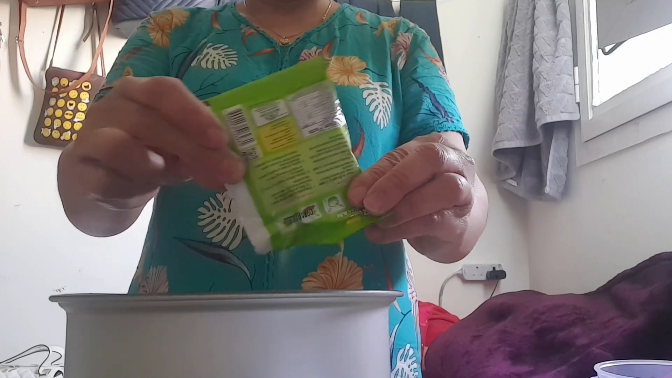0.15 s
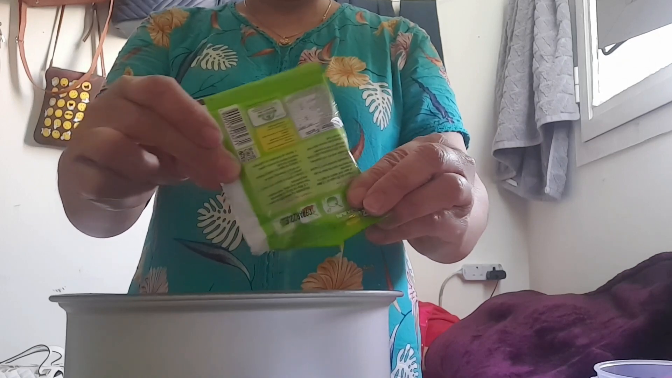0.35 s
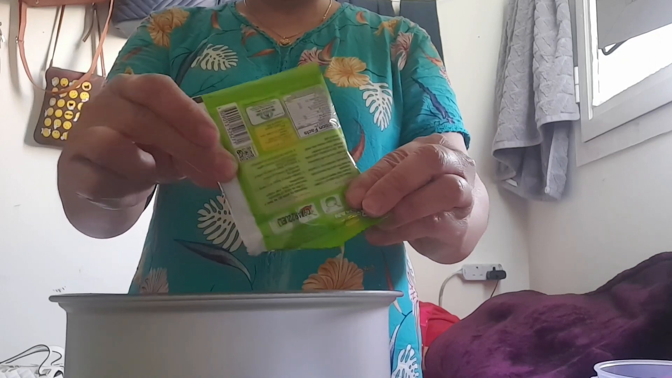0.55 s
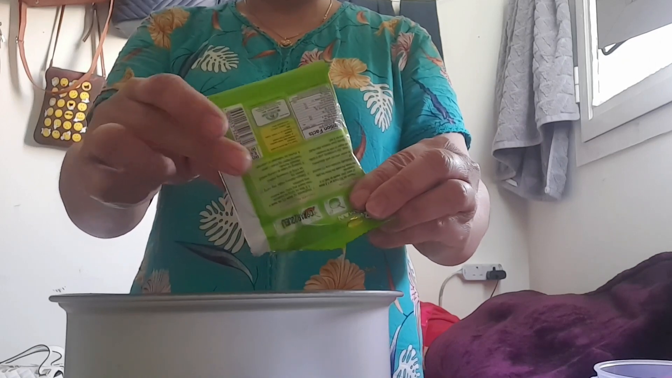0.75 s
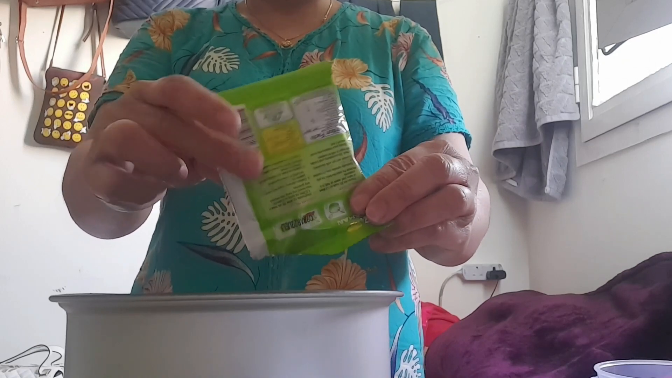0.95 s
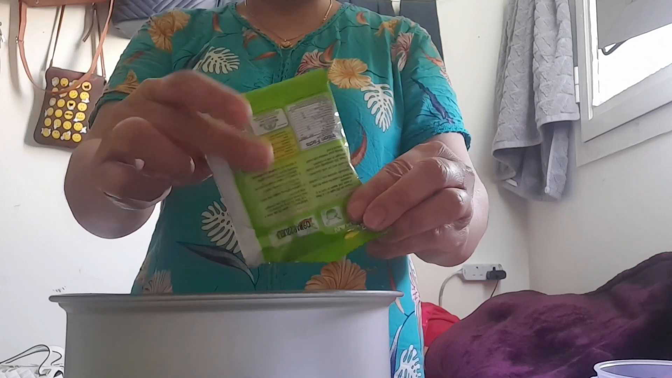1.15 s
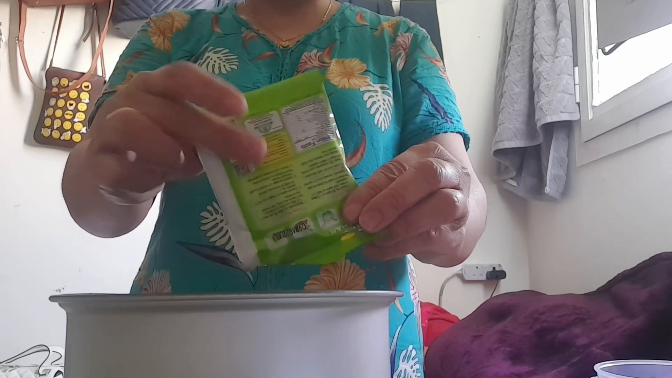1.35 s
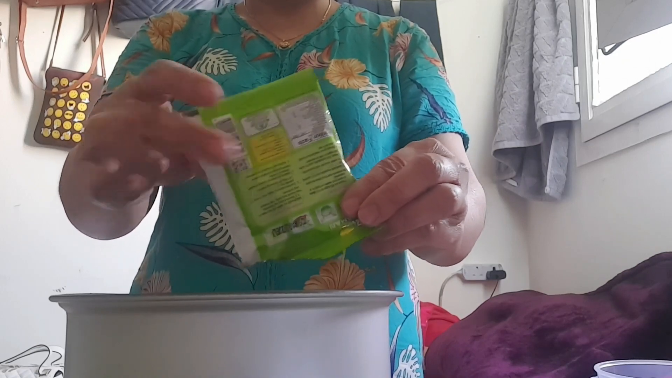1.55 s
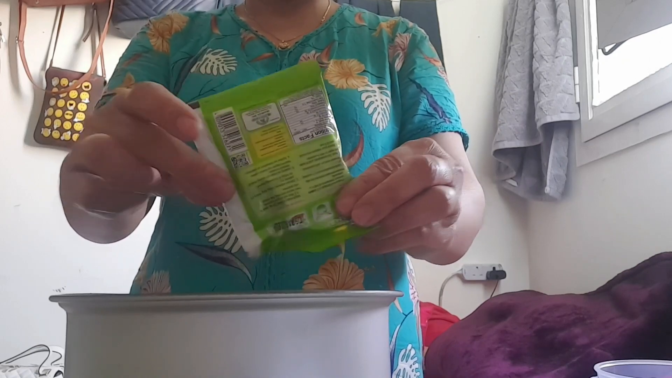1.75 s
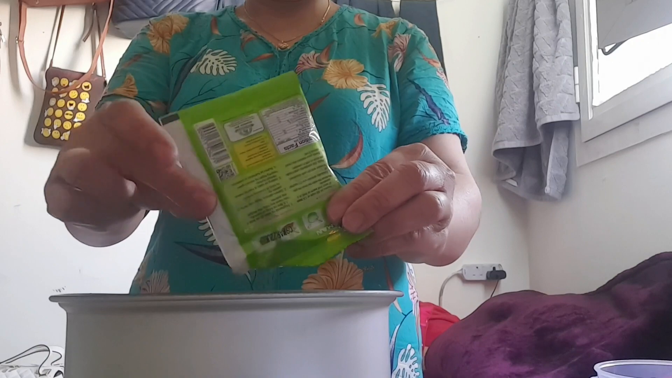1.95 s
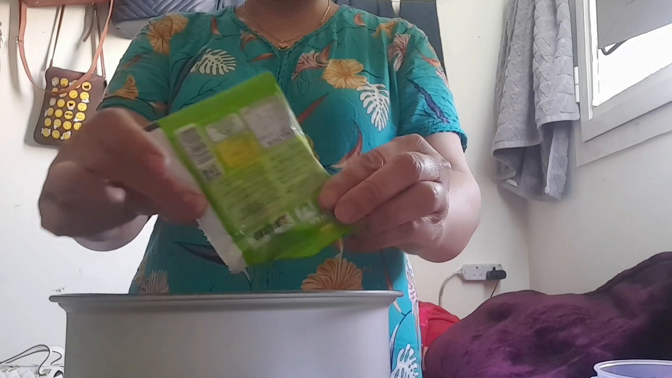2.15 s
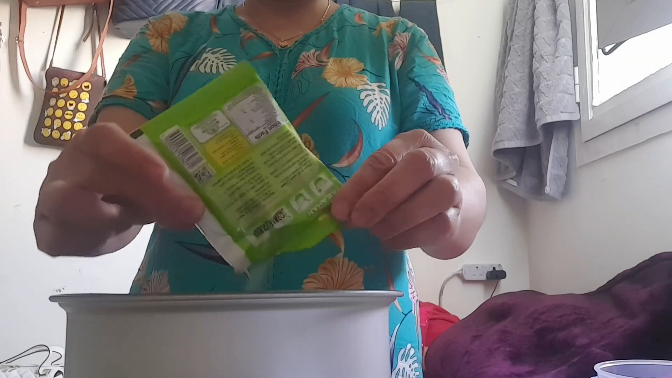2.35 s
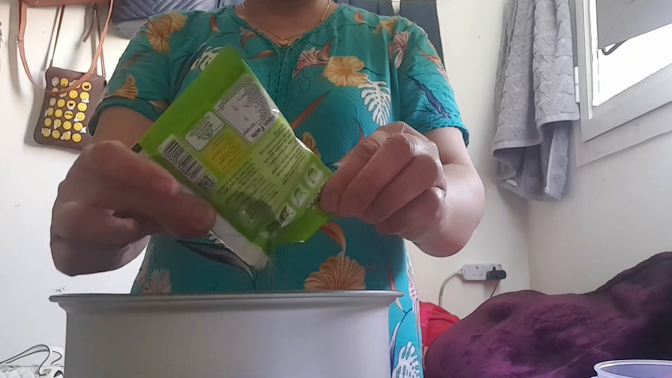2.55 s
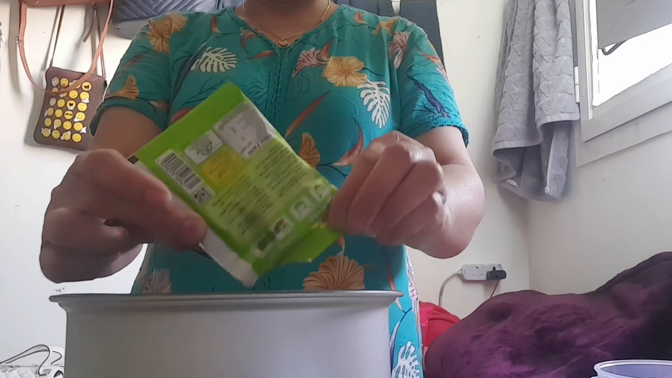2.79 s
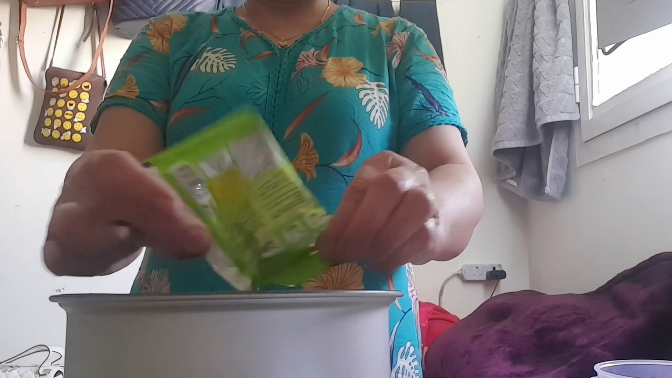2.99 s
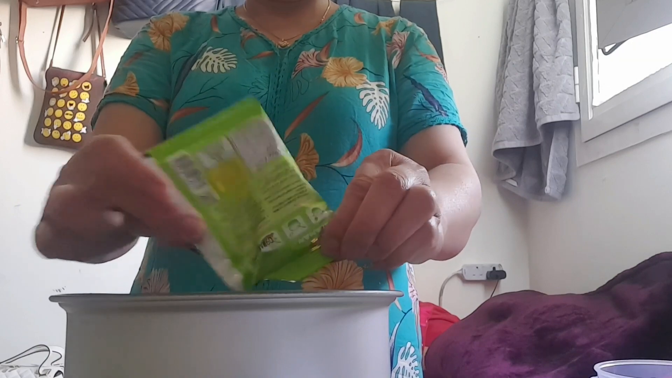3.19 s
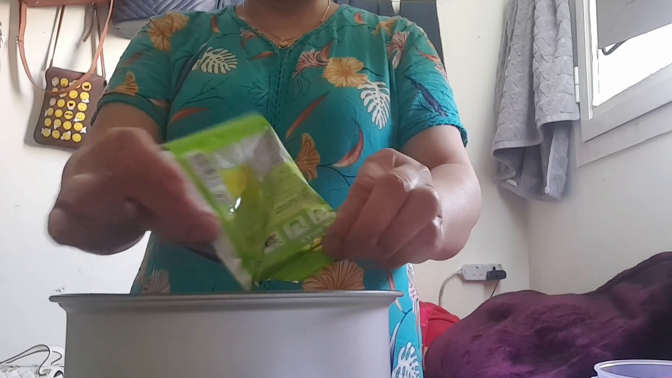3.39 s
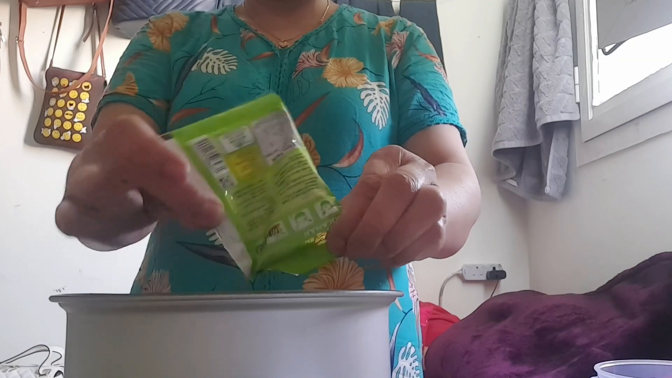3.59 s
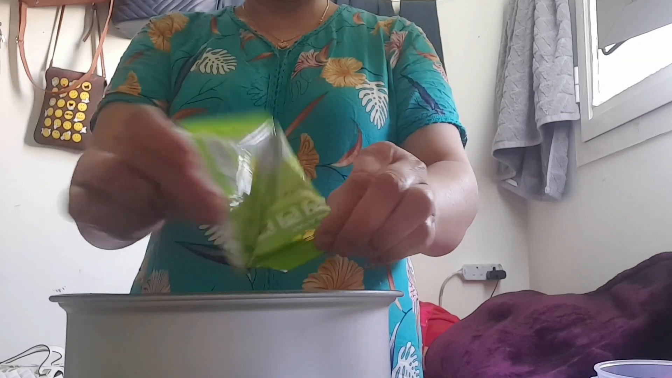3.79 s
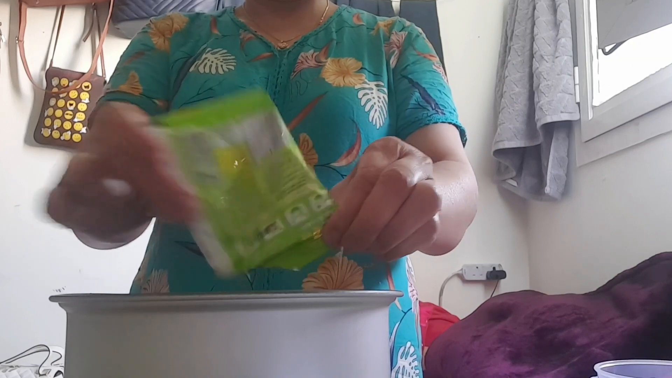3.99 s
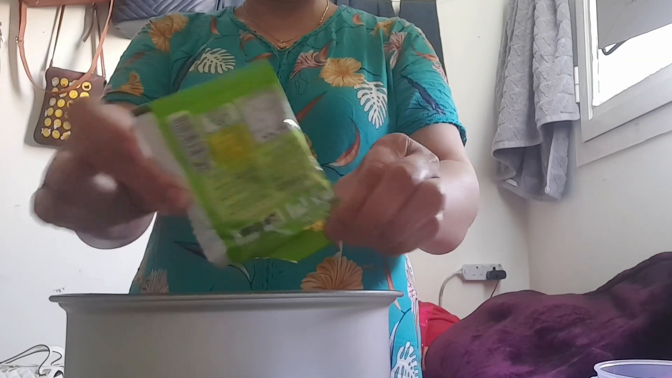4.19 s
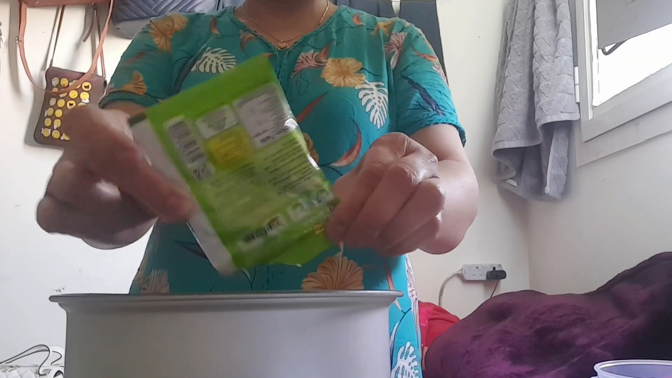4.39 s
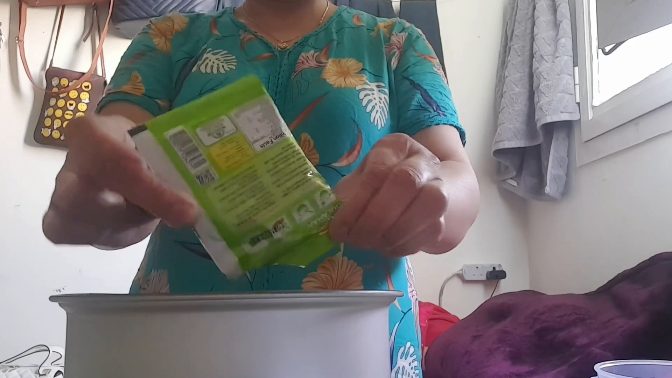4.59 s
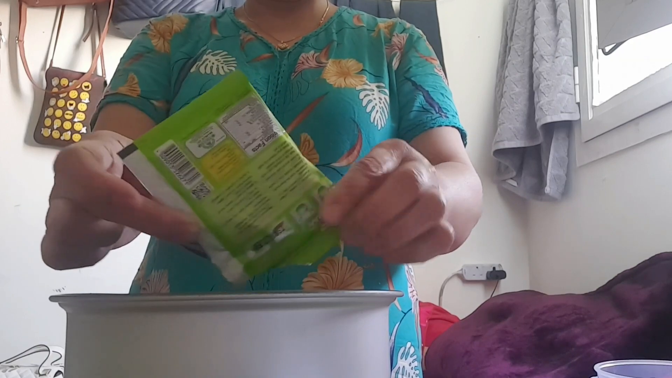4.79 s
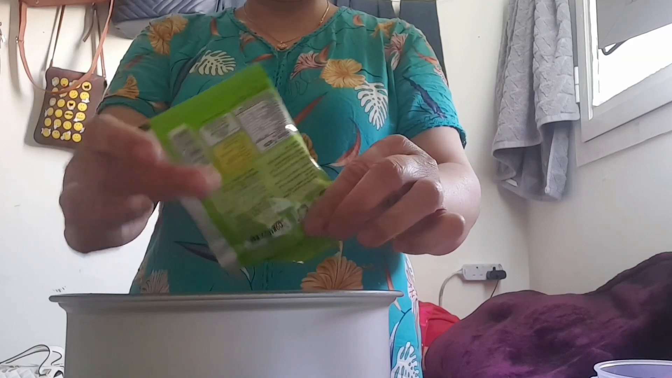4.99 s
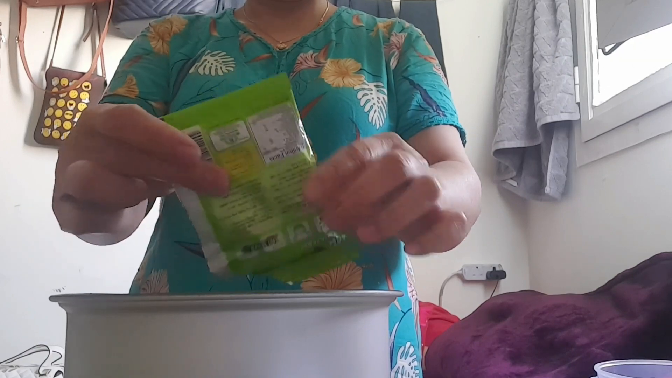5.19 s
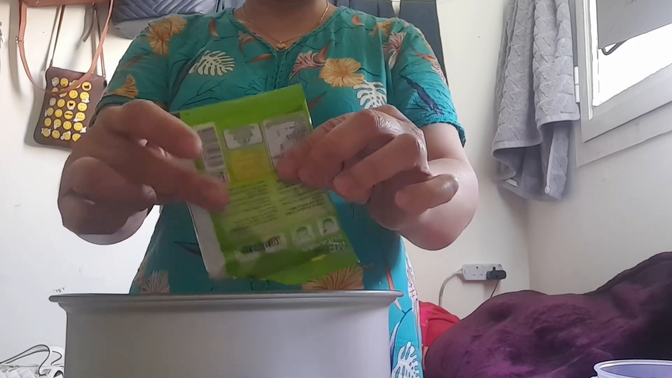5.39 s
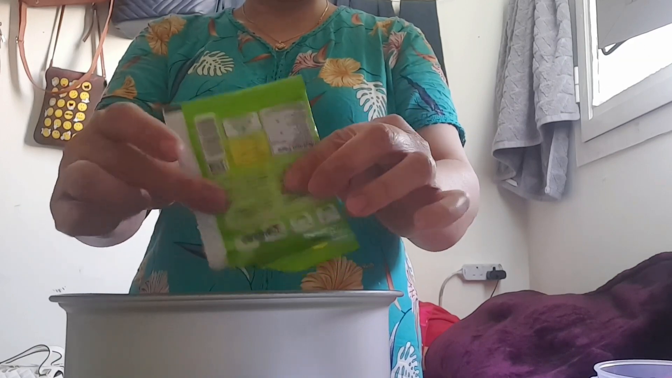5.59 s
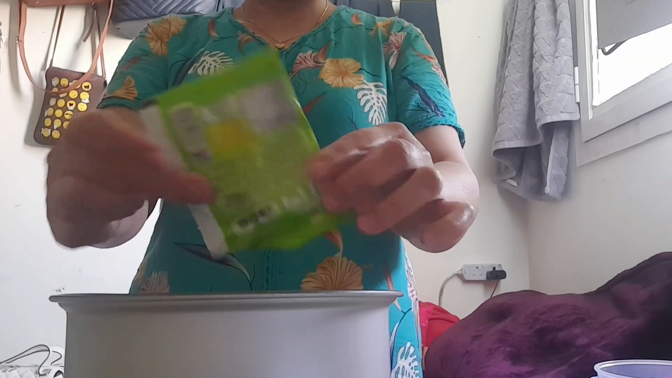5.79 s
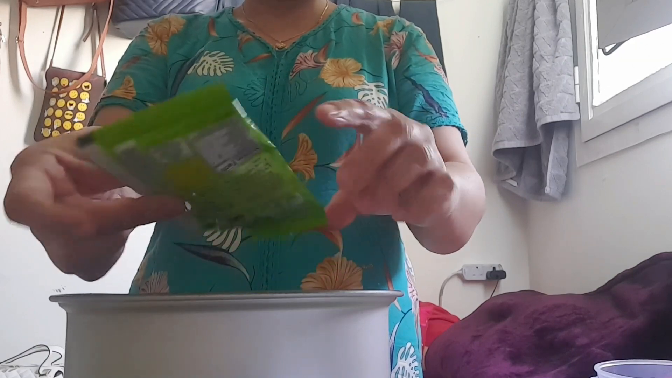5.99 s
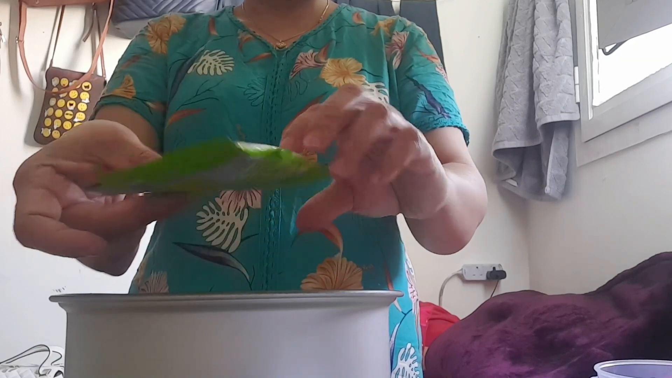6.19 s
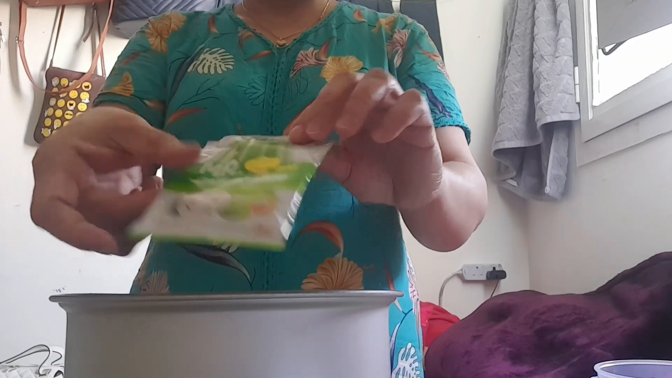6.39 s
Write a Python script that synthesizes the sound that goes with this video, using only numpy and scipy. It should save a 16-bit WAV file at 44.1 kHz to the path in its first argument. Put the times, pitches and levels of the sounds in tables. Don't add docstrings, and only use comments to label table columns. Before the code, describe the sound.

A small plastic sachet is handled very close to the microphones above a metal pot in a small kitchen. Throughout, an appliance across the room gives a low, dull, slightly flickering rumble, with a faint thin whine clearest in the first second and a half. From 0 to 0.7 s the film is jiggled in quick, light, dry clicks. From 0.86 to 1.6 s come spaced finger taps, soft thumps with crisp snaps, and a brief hiss of sliding powder around 1.4 s. From 1.8 to 2.9 s pinched folds pop sharply. From 3 s it is shaken hard, then flicked: dense bright crackles and dull thumps, loudest near 4.4 s, with a faint hollow ring from the pot. After 4.7 s it eases; sparser crinkles follow as it is flattened until 5.9 s, then near quiet over the rumble, one last snap at 6.4 s.

```python
import sys
import numpy as np
from scipy import signal
from scipy.fft import rfft, irfft
from scipy.io import wavfile

SR = 44100
rng = np.random.default_rng(int(sys.argv[2]) if len(sys.argv) > 2 else 0)


def unload_audio(sound):
    columns = np.transpose(np.atleast_2d(sound))
    steps = np.round(np.clip(columns, -1, 1) * 32767)
    wavfile.write(sys.argv[1], SR, steps.astype(np.int16))


def convert_level_to_amplitude(level_db):
    exponent = np.asarray(level_db, float) / 20
    return 10 ** exponent


N = 284400


def rms_one(x):
    return x / np.sqrt(np.mean(x ** 2) + 1e-20)


def in_time(rows):
    s, value = np.transpose(rows)
    return np.interp(np.arange(N) / SR, s, value)


def at_hz(points, hz):
    points_hz, value = np.transpose(points)
    return np.interp(np.log(hz), np.log(points_hz), value)


def drift(rate_hz):
    r = np.exp(-2 * np.pi * rate_hz / SR)
    return rms_one(signal.lfilter([1], [1, -2 * r, r * r], rng.standard_normal(N + SR))[SR:])


def colour(x, points, share=1):
    size = 8192
    hz = np.arange(size // 2 + 1) * SR / size + 1
    cepstrum = irfft(share * at_hz(points, hz) * np.log(10) / 20)
    cepstrum[1:size // 2] *= 2
    cepstrum[size // 2 + 1:] = 0
    response = irfft(np.exp(rfft(cepstrum)))
    return np.array([signal.fftconvolve(v, response)[:N] for v in x])


def band(x, low_hz, high_hz):
    return signal.sosfilt(signal.butter(2, [low_hz, high_hz], "band", fs=SR, output="sos"), x)


def resonate(x, hz, width_hz):
    r = np.exp(-np.pi * width_hz / SR)
    poles = [1, -2 * r * np.cos(2 * np.pi * hz / SR), r * r]
    return signal.lfilter([(1 - r * r) / 2, 0, (r * r - 1) / 2], poles, x)


def snaps(shape, per_s, spread_db):
    sizes = convert_level_to_amplitude(spread_db * np.minimum(rng.exponential(1, shape), 3))
    sizes = sizes * (rng.random(shape) < per_s / SR)
    signs = rng.choice([-1, 1], (*shape[:-1], 3, shape[-1]))
    return rms_one(sizes)[..., None, :] * signs


def swell(rise_ms, fall_ms):
    rise_roundness, fall_roundness = 0.95, 0.87
    ms = (np.arange(3000) - 1000) / SR * 1000
    rise = (np.maximum(-ms, 0) / np.clip(rise_ms, .1, 9)) ** rise_roundness
    fall = (np.maximum(ms, 0) / np.clip(fall_ms, .2, 16)) ** fall_roundness
    return np.exp(-rise - fall)


# start in seconds, peak in dB, ring of the fold in Hz.
EARLY_SNAPS = [(0.0268, -28, 3110.0), (0.0354, -24, 3320.0), (0.0397, -23, 1310.0), (0.051, -35, 3200),
               (0.1134, -31, 2870.0), (0.1265, -27, 2750.0), (0.1298, -29, 2630.0), (0.147, -22, 1580),
               (0.187, -30, 2550.0), (0.1948, -28.0, 1510.0), (0.2063, -24, 2680.0), (0.222, -20, 2650.0),
               (0.236, -21, 2850), (0.2775, -29, 1280.0), (0.333, -32, 2850), (0.3375, -21, 2650),
               (0.342, -34, 2870.0), (0.3502, -17, 1560), (0.3603, -21, 2570.0), (0.417, -31, 3080.0),
               (0.4268, -25, 2550.0), (0.4472, -19, 2580.0), (0.4563, -21, 2850), (0.4746, -29, 4310.0),
               (0.55, -34, 2750), (0.5646, -20, 4280), (0.6313, -31.0, 1380.0), (0.6417, -17, 2900),
               (0.6898, -38, 2820.0), (0.8506, -33, 2310.0), (0.8597, -41, 2660.0), (0.863, -20, 1560),
               (0.996, -30, 2930.0), (1.0282, -11.5, 2960), (1.091, -30, 1510.0), (1.095, -21, 2850),
               (1.2, -17.5, 2850.0), (1.2103, -17.5, 2770.0), (1.2987, -25, 2550.0),
               (1.3006, -22.5, 2590.0), (1.412, -33, 4530), (1.475, -33, 1110.0), (1.477, -23.5, 2620.0),
               (1.4973, -27, 1640.0), (1.5807, -33, 1530.0), (1.7627, -45, 2410.0), (1.819, -32, 1520.0),
               (1.8251, -13, 1930), (1.8384, -19.5, 3650), (1.8746, -11, 1840), (1.932, -37, 3190.0),
               (1.947, -27, 2590.0), (1.9757, -27, 3600.0), (2.099, -19, 2660), (2.1358, -23, 2380),
               (2.191, -29, 2830.0), (2.2427, -11, 1610), (2.2581, -24, 2440.0)]
SHAKEN_SNAPS = [(2.4453, -14.5, 2040), (2.4589, -35, 2130.0), (2.4668, -27, 2150.0), (2.4977, -41, 2520.0),
                (2.501, -22, 2530.0), (2.507, -29, 2590.0), (2.5141, -28, 2020.0), (2.522, -41, 1400),
                (2.5615, -39, 1470), (2.646, -38, 4300), (2.6764, -34, 2580), (2.709, -20, 1550.0),
                (2.7177, -25, 3700.0), (2.7332, -9, 3600), (2.7448, -32, 2790.0), (2.798, -24, 2770.0),
                (2.9012, -46, 1570.0), (2.9153, -42, 2650), (3.021, -18, 3680.0), (3.0443, -12, 2350),
                (3.108, -15.5, 3630), (3.1225, -33, 2550.0), (3.169, -23, 4450.0), (3.184, -25, 2870.0),
                (3.206, -24, 2820.0), (3.2488, -24, 2450), (3.252, -9, 2400.0), (3.268, -34, 2080.0),
                (3.336, -22, 2760.0), (3.3492, -5.5, 2510.0), (3.3664, -14, 2150.0), (3.4, -16, 2370.0),
                (3.4079, -27, 2270.0), (3.417, -18.5, 1440.0), (3.434, -14, 2660.0), (3.4923, -14, 3910.0),
                (3.529, -31, 2960.0), (3.536, -9, 2930), (3.544, -17, 3040.0), (3.589, -6, 2430),
                (3.593, -24, 2660.0), (3.6001, -29, 1860), (3.6136, -17, 1480.0), (3.637, -18, 4430.0),
                (3.6925, -31, 2850.0), (3.735, -37, 2780.0), (3.76, -23, 2470.0), (3.766, -20, 2730),
                (3.7852, -29, 2800), (3.8866, -21, 2860.0), (3.8979, -11.5, 2870.0), (3.9323, -22, 2550.0),
                (3.941, -26, 2830.0), (3.9474, -10, 2700), (3.9588, -13.5, 2890.0), (4.069, -17, 2850.0),
                (4.0733, -15, 2980), (4.0874, -32, 4380.0)]
LATE_SNAPS = [(4.1457, -23, 3020), (4.159, -7.5, 3280), (4.1678, -27, 2850.0), (4.197, -17, 2880),
              (4.2412, -14, 3170), (4.249, -8, 1950.0), (4.278, -14, 4600.0), (4.281, -28, 2950.0),
              (4.304, -13, 2410.0), (4.315, -11, 1410), (4.3178, -5.5, 2260), (4.426, -28, 3650.0),
              (4.4316, -13, 2720), (4.4412, -10, 2850), (4.472, -20.5, 2850.0), (4.484, -20, 2490.0),
              (4.4884, -21, 2830.0), (4.5046, -16, 2730.0), (4.559, -13, 2630), (4.5618, -8.5, 2850),
              (4.591, -19, 4640), (4.6015, -27, 4420), (4.6679, -21.5, 2150), (4.7097, -40, 2630.0),
              (4.901, -26, 3070.0), (4.9127, -33, 2830.0), (4.9232, -18.5, 2780.0), (4.9314, -13, 2970),
              (5.0743, -25, 2690.0), (5.078, -17, 2700.0), (5.0869, -14, 1520), (5.199, -32, 2070),
              (5.2216, -25, 4140), (5.3576, -19, 2950), (5.37, -17, 4270.0), (5.4121, -22, 2450.0),
              (5.415, -22, 3020), (5.491, -17, 2780.0), (5.4958, -13.5, 2030), (5.6342, -20, 3700.0),
              (5.6493, -23, 4280), (5.6526, -12, 4070), (5.6705, -22, 1230), (5.679, -19, 3960.0),
              (5.683, -19, 3850), (5.6887, -32, 3770.0), (5.6973, -27, 4130.0), (5.807, -31, 4450.0),
              (5.881, -14, 2900), (5.8855, -16, 2850), (6.3893, -14, 2800)]


def pops():
    fall_ms, spray_db, ring_db, level_db = 1.36, -6.5, 7, 8.5
    rows = EARLY_SNAPS + SHAKEN_SNAPS + LATE_SNAPS
    fall = np.exp(-np.arange(600) / SR * 1000 / fall_ms)
    out = np.zeros((3, N + 600))
    for (s, db, hz), spray in zip(rows, rng.standard_normal((len(rows), 3, 600))):
        burst = convert_level_to_amplitude(spray_db) * spray * fall
        burst[:, 0] = np.sign(spray[0, 0])
        ring = convert_level_to_amplitude(ring_db) * resonate(burst, hz, .2 * hz)
        at = round(s * SR) - 20
        out[:, at:at + 600] += convert_level_to_amplitude(db + level_db) * (burst + ring)
    return band(out[:, :N], 1680, 22000)


# start in seconds, buckle level in dB, crack level in dB, length in ms.
JIGGLING = [(0.001, -23, -27, 5.3), (0.0118, -24, -32, 2.4), (0.0267, -46, -33, 5.1),
            (0.035, -28, -21, 2.9), (0.041, -28, -30, 4.5), (0.052, -22.5, -31, 9.7),
            (0.1147, -39, -28, 3.5), (0.125, -24, -40, 6.6), (0.1395, -21, -30, 11),
            (0.1953, -24.5, -43, 5), (0.2076, -20, -23.5, 3.6), (0.2236, -26.5, -26.5, 6),
            (0.2357, -23.5, -27.5, 12), (0.2784, -32, -36, 3.8), (0.3346, -25.5, -43, 6.2),
            (0.3502, -23, -32, 8.2), (0.414, -24.5, -35, 7.4), (0.4275, -25, -26, 3.6),
            (0.435, -24.5, -39, 7.4), (0.445, -26, -21, 2), (0.4567, -22, -27, 3.2), (0.463, -21, -21, 5.4),
            (0.497, -31, -37, 3.9), (0.556, -24.5, -34, 8), (0.5714, -18.5, -24, 5.4),
            (0.6158, -30, -48, 3.5), (0.6325, -25.5, -40, 6.9), (0.6425, -26, -20.5, 3.5),
            (0.6892, -24, -27, 2.6), (0.726, -35, -47, 3.4)]
TAPPING = [(0.8643, -22, -23.5, 5.1), (0.9962, -35, -34, 3.3), (1.0097, -35, -31, 4.3),
           (1.029, -22.5, -19.5, 4.1), (1.091, -18.5, -23.5, 3.8), (1.169, -36, -48, 3.4),
           (1.2012, -21, -20.5, 2.6), (1.2114, -35, -30, 4.7), (1.298, -27, -41, 6.9),
           (1.41, -32, -34, 4.4), (1.4809, -19.5, -30, 3.9), (1.5813, -32.5, -54, 3.2)]
PINCHING = [(1.764, -42, -43, 10), (1.8185, -39, -21, 2.5), (1.8251, -23, -19, 3.8),
            (1.8374, -24, -16.5, 3.5), (1.8742, -19, -11.5, 2.4), (1.8928, -44, -44, 5.5),
            (1.9333, -23, -32, 3.3), (1.9486, -24, -29, 5.9), (1.9748, -25.5, -28.5, 6),
            (2.073, -35, -52, 8.2), (2.0977, -16, -34, 1.65), (2.134, -32, -25, 3.4),
            (2.194, -35, -39, 7.8), (2.2314, -28, -32, 6.1), (2.244, -22, -19.5, 3.8),
            (2.26, -46, -24, 4.9), (2.4434, -22, -29.5, 1.8), (2.5008, -23, -46, 3.5),
            (2.525, -24.5, -35, 5.6), (2.5436, -25, -35, 4.1), (2.563, -28, -36, 2.6), (2.685, -28, -36, 3),
            (2.697, -34.5, -48, 9.2), (2.7077, -21, -35, 2.3), (2.717, -25, -35, 6.7),
            (2.7316, -15, -12.5, 3.2), (2.7964, -25.5, -48, 4.5), (2.833, -24, -57, 1.9),
            (2.848, -33.5, -58, 2.4), (2.92, -25.5, -39, 8.6)]
SHAKING = [(3.024, -23, -38, 5.4), (3.0454, -15.5, -14, 3.4), (3.067, -21.5, -29, 11),
           (3.0855, -24.5, -31, 3.6), (3.109, -17.5, -9, 2), (3.1265, -24, -20.5, 3.7),
           (3.1887, -22, -31, 13), (3.204, -30, -33, 4.5), (3.235, -23.5, -35, 7.2),
           (3.2526, -18, -27.5, 2.7), (3.3352, -32, -31, 7.1), (3.3493, -16, -12.5, 5.1),
           (3.397, -22, -24, 3.7), (3.408, -48, -23, 7.9), (3.4202, -18.5, -17.5, 11),
           (3.4914, -32, -13, 2.2), (3.5316, -16.5, -13, 7.1), (3.5896, -22, -20, 5.4),
           (3.6008, -20.5, -21, 11), (3.615, -27, -25.5, 11), (3.6358, -20, -12.5, 2.8),
           (3.6934, -31.5, -46, 3.3), (3.7165, -39, -50, 2.4), (3.7348, -19.5, -19, 1.7),
           (3.7648, -24, -23.5, 6), (3.7856, -24.5, -24.5, 9.4), (3.8126, -38, -32, 8.7),
           (3.863, -23, -26.5, 2.2)]
FLICKING = [(3.899, -16, -11.5, 7.3), (3.935, -34, -27, 5.4), (3.9463, -14.5, -14.5, 5.5),
            (3.958, -16, -19, 4.6), (3.9918, -40, -39, 6), (4.073, -13, -6.5, 5.2), (4.129, -40, -25, 3.4),
            (4.1425, -20.5, -19.5, 10), (4.159, -23.5, -19, 13), (4.1693, -29, -16, 10),
            (4.1969, -22.5, -14, 6.2), (4.244, -11.5, -13.5, 3.9), (4.28, -27, -23, 6),
            (4.3037, -24, -16, 8.2), (4.317, -15, -13, 3.3), (4.353, -32, -31, 5.4), (4.371, -29, -27, 4.1),
            (4.4268, -29, -31, 5.2), (4.4385, -20, -13.5, 7), (4.47, -30, -32, 6.2),
            (4.4828, -38, -19, 3.4), (4.488, -24.5, -20.5, 8.6), (4.504, -19.5, -21, 5.4),
            (4.563, -15, -14.5, 3.5), (4.5923, -29, -27, 3), (4.6028, -26, -25.5, 4.8),
            (4.659, -34, -41, 5), (4.668, -42, -40, 4.9), (4.7094, -37, -44, 3.1), (4.743, -42, -37.5, 5)]
FLATTENING = [(4.902, -37, -39, 7.6), (4.912, -29, -26.5, 7.1), (4.9299, -16, -19, 1.8),
              (5.068, -40, -39, 4.3), (5.0859, -20.5, -13.5, 6), (5.1734, -29, -47, 3.4),
              (5.184, -37, -35, 5.5), (5.1982, -26, -37, 4.9), (5.22, -26.5, -26.5, 2),
              (5.361, -25.5, -25.5, 6.5), (5.3705, -30, -24.5, 7.3), (5.401, -53, -39, 7),
              (5.4155, -20.5, -21, 3.6), (5.446, -26, -32, 2.2), (5.4949, -22, -25, 5.8),
              (5.553, -34, -53, 5.2), (5.5805, -34.5, -51, 8), (5.6337, -28, -46, 8),
              (5.6486, -20, -16.5, 4.5), (5.6708, -30, -28, 12), (5.683, -20.5, -11, 3.2),
              (5.689, -32, -29, 2.3), (5.697, -37, -33, 6.5), (5.806, -31, -33, 9.1),
              (5.865, -40, -62, 3.2), (5.884, -23.5, -21, 4.1), (5.938, -35, -43, 5.1),
              (6.2195, -65, -40, 4.6), (6.3884, -17.5, -18, 1.5)]


def gestures():
    when_s, _, ring_hz = np.transpose(EARLY_SNAPS + SHAKEN_SNAPS + LATE_SNAPS)
    gives = []
    for row in JIGGLING + TAPPING + PINCHING + SHAKING + FLICKING + FLATTENING:
        nearest_hz = ring_hz[np.argmin(abs(when_s - row[0]))]
        gives.append((*row, nearest_hz * rng.uniform(0.88, 0.99)))
    return gives


SPLIT_HZ = 5290


def folds(gives):
    lag_ms, shortest_ms = .8, 1.06
    fold_db, bright_db, stutter_db = -4.5, -14, 2.0
    swarms, out = snaps((len(gives), 3000), 8000, 3.6), np.zeros((3, N + 3000))
    for (s, db, _, ms, hz), swarm in zip(gives, swarms):
        burst = swarm * swell(1.2 * (ms - shortest_ms), 0.87 * ms)
        ring = convert_level_to_amplitude(fold_db) * resonate(burst, hz, .25 * hz)
        at = round((s + lag_ms / 1000) * SR)
        out[:, at:at + 3000] += convert_level_to_amplitude(db) * (burst + ring)
    out = out[:, 1000:N + 1000] * convert_level_to_amplitude(stutter_db * np.tanh(drift(140)))
    return convert_level_to_amplitude(5.5) * (band(out, 600, SPLIT_HZ) + convert_level_to_amplitude(bright_db) * band(out, SPLIT_HZ, 16000))


def creases(gives):
    sudden_ms, lead = 1.7, 0.56
    boost_db = 1
    gain_db, tint_db, middle_db, stutter_db = -1.5, -5.0, -16.5, 5.5
    swarms, out = snaps((len(gives), 3000), 15000, 1.0), np.zeros((3, N + 3000))
    for (s, _, db, ms, _), swarm, hz in zip(gives, swarms, rng.uniform(3700, 13400, len(gives))):
        fall_ms = 0.47 + 0.46 * ms
        burst = swarm * swell(lead * (ms - sudden_ms), fall_ms) * convert_level_to_amplitude(boost_db * np.log2(5 / ms))
        tint = convert_level_to_amplitude(tint_db) * resonate(burst, hz, .3 * hz)
        at = round(s * SR)
        out[:, at:at + 3000] += convert_level_to_amplitude(db + gain_db) * (burst + tint)
    out = out[:, 1000:N + 1000] * convert_level_to_amplitude(stutter_db * np.tanh(drift(200)))
    return convert_level_to_amplitude(10.0) * (band(out, SPLIT_HZ, 22000) + convert_level_to_amplitude(middle_db) * band(out, 1300, SPLIT_HZ))


# start in seconds, thump level in dB.
TAPS = [(0.86, -23), (1.09, -18), (1.297, -17.5), (1.477, -26.5), (2.244, -45), (2.735, -24), (3.043, -22),
        (3.349, -16.5), (3.528, -18.5), (3.59, -20.5), (3.898, -15), (3.946, -21), (4.071, -16),
        (4.241, -15), (4.437, -11), (4.562, -16), (5.082, -28), (5.492, -31)]


def taps():
    pulse = convert_level_to_amplitude(-10.0) * swell(0.75, 1.3)
    puff_swell = convert_level_to_amplitude(-1.5) * swell(2.1, 5.1)
    out = np.zeros(N + 3000)
    for (s, db), puff in zip(TAPS, rng.standard_normal((len(TAPS), 3000))):
        at = round(s * SR) + 130
        out[at:at + 3000] += convert_level_to_amplitude(db) * (puff * puff_swell - pulse)
    return convert_level_to_amplitude(15.0) * band(out[1000:N + 1000], 157, 427)


# time in seconds, level in dB.
CREAK = [
    (0.0, -55),
    (0.97, -50),
    (4.4, -43),
    (4.74, -48),
    (5.48, -51),
    (6.45, -51),
]
# time in seconds, level in dB.
POWDER = [(0, -52), (.1, -58), (1.33, -51), (1.42, -41.5), (1.6, -52.5), (1.8, -48), (2.06, -65),
          (2.55, -48), (2.66, -46.5), (2.85, -74), (3.03, -73), (3.2, -54.5), (3.55, -47), (3.9, -51),
          (4.3, -43), (4.72, -72), (5.6, -90), (6.45, -61)]


def rustle():
    creaks = rms_one(band(snaps((N,), 3000, 2.4), 480, SPLIT_HZ) * convert_level_to_amplitude(1.9 * drift(41)))
    powder = rms_one(band(snaps((N,), 15000, 2.6), 7500, 22000) * convert_level_to_amplitude(1.3 * drift(24)))
    return convert_level_to_amplitude(in_time(CREAK) - 3.0) * creaks + convert_level_to_amplitude(in_time(POWDER) + 3.5) * powder


# frequency in Hz, density in dB per Hz.
FILM = [(290, -25), (500, -1), (623, -20.5), (721, -5), (994, -15), (1200, -4), (2100, -7), (2810, -6),
        (4000, -7.5), (5900, -9), (6700, -14), (7450, -8), (8400, -15), (14700, -13), (16500, -29)]


def over_pot(film):
    pot_hz, pot_width_hz, pot_db = 2850, 87, -3
    film = film + convert_level_to_amplitude(pot_db) * resonate(film, pot_hz, pot_width_hz)
    return convert_level_to_amplitude(5.5) * colour(film, FILM)


def heard(swarms):
    alike_hz, right_lag_samples = 3700, 4
    shared, left, right = swarms
    low = signal.butter(2, alike_hz, fs=SR)
    high = signal.butter(2, alike_hz, "high", fs=SR)
    same = signal.lfilter(*low, shared)
    late = np.roll(same, right_lag_samples)
    return np.array([same + signal.lfilter(*high, left), late + signal.lfilter(*high, right)])


def kitchen():
    t60_s = 0.23
    t = np.arange(SR // 2) / SR
    fall = convert_level_to_amplitude(-60 * t / t60_s) * (t > .003)
    spectrum = rfft(rng.standard_normal((2, len(t))) * fall)
    flat = irfft(spectrum / abs(spectrum))
    tail = signal.lfilter([1], [1, -.2], flat * np.sqrt(fall))
    return tail / np.linalg.norm(tail[0])


# frequency in Hz, left minus right in dB.
TILT = [(200, 3), (950, -3), (4400, 1.5), (12000, 0)]


def space(x, tail):
    stirred = x * np.tanh(3.4 * drift(44))
    left, right = x + convert_level_to_amplitude(-6.5) * signal.fftconvolve(stirred, tail, axes=1)[:, :N]
    return np.vstack([colour([left], TILT, share=0.77), colour([right], TILT, share=-0.56)])


# frequency in Hz, density in dB per Hz.
RUMBLE = [(24, -21), (40, -4), (106, -3.5), (171, -10), (290, -11), (433, -20), (491, -23), (680, -27),
          (873, -29), (1090, -33.5), (16000, -63)]
# frequency in Hz, left-right likeness from -1 to 1.
LIKENESS = [(50, 0.94), (200, 0.93), (380, 0.78), (620, -0.81), (1500, -0.13)]
# time in seconds, level in dB.
HUM = [
    (0.0, -30.5),
    (5.62, -33),
    (6.45, -32),
]
# time in seconds, level in dB.
WHINE = [
    (0, -42),
    (.9, -52.5),
    (1.05, -47),
    (1.35, -45),
    (1.5, -80),
    (2.8, -59),
    (6.45, -54),
]


def appliance():
    rumble, edges_hz = 0, 22 * 2 ** np.arange(0, 9.8, .5)
    white = rng.standard_normal((2, 2, N))
    for k, (low_hz, high_hz) in enumerate(zip(edges_hz, edges_hz[1:])):
        mid, side = band(white[k % 2], low_hz, high_hz)
        hz = np.sqrt(low_hz * high_hz)
        alike = np.clip(at_hz(LIKENESS, hz), -1, 1)
        stereo = np.sqrt(1 + alike) * mid + np.sqrt(1 - alike) * side * [[1], [-1]]
        rumble = rumble + convert_level_to_amplitude(at_hz(RUMBLE, hz) + 1.47 * drift(5.9)) * stereo
    drone = convert_level_to_amplitude(-20.5) * rms_one(resonate(white[0, 0], 100.7, 9.3))
    whine = rms_one(resonate(white[1, 0], 904, 7.1))
    whine = convert_level_to_amplitude(in_time(WHINE) - 7.5 + 1.5 * drift(7.6)) * whine
    return (convert_level_to_amplitude(in_time(HUM) + 2.0) * (rms_one(rumble) + drone) + whine) * convert_level_to_amplitude([[-1.3], [1.3]])


def scene():
    gives = gestures()
    film = over_pot(folds(gives) + creases(gives) + rustle() + pops())
    close = heard(film) * convert_level_to_amplitude([[-1.2], [1.2]]) + taps()
    return space(close, kitchen()) + appliance()


def low_pass(x):
    return signal.sosfilt(signal.butter(12, 16830, fs=SR, output="sos"), x)


def record(dry):
    dry = signal.sosfilt(signal.butter(4, 44, "high", fs=SR, output="sos"), dry)
    dry = signal.sosfilt(signal.cheby2(10, 35, 16200, fs=SR, output="sos"), dry)
    return low_pass(1.542 * np.tanh(dry / 1.467))


dry = scene()
out = record(dry)
unload_audio(out)
```